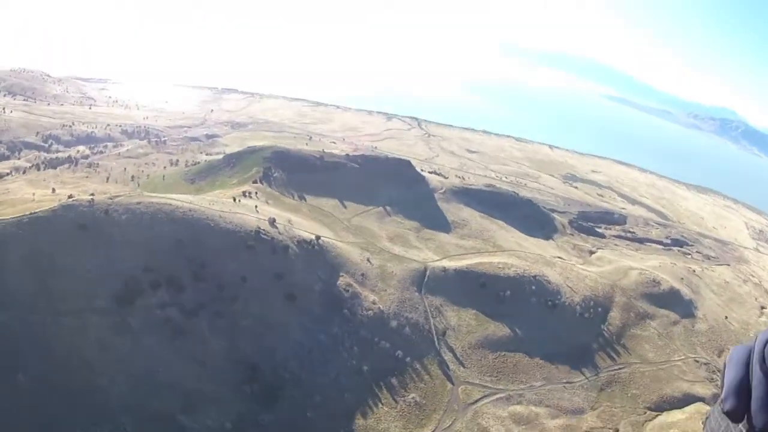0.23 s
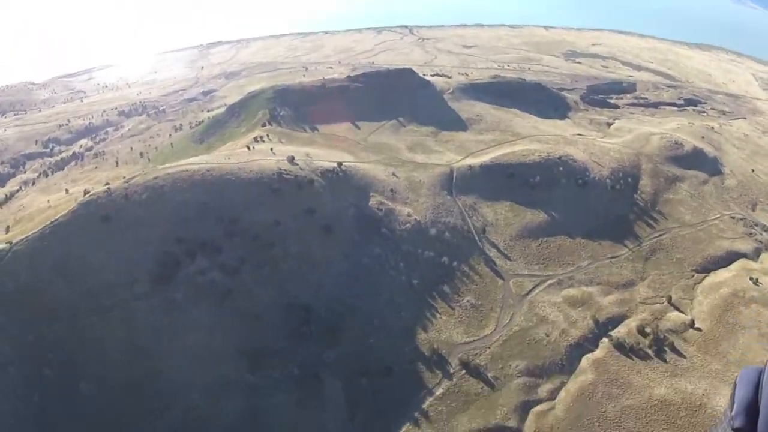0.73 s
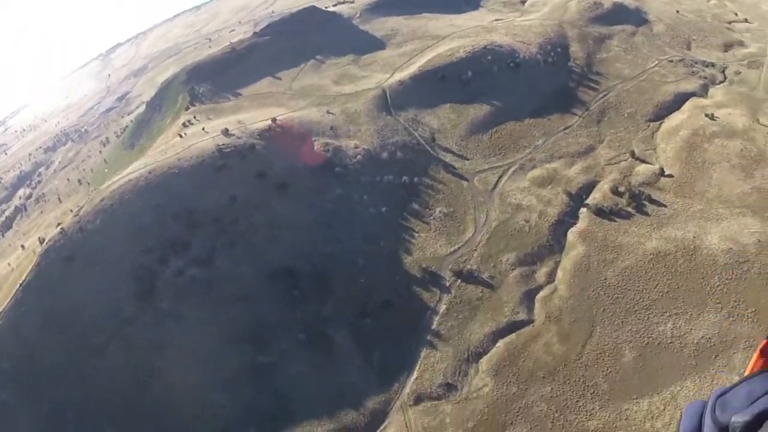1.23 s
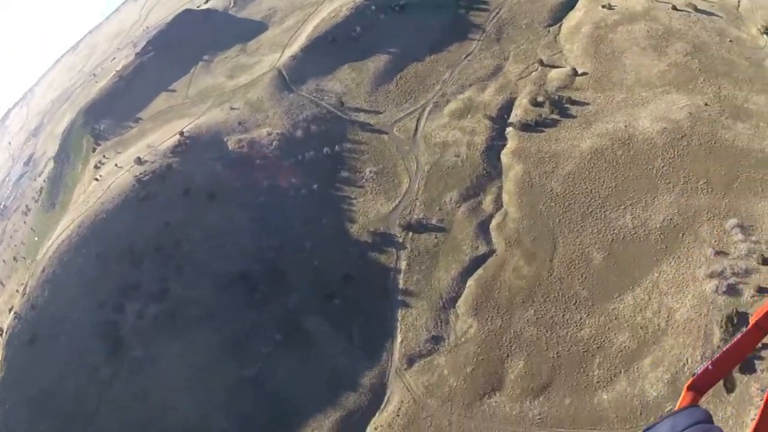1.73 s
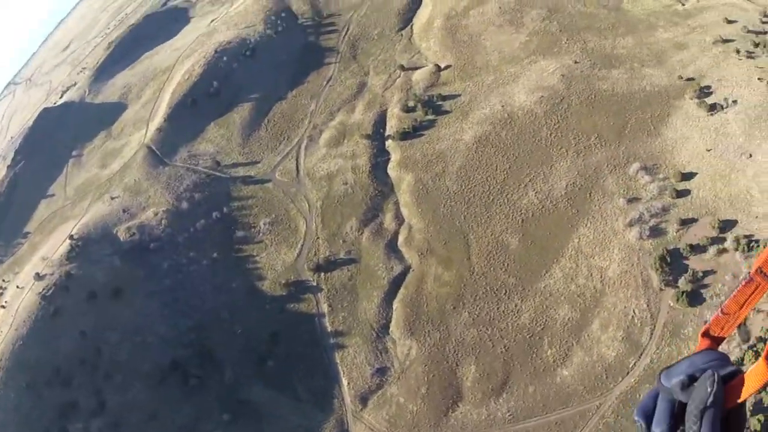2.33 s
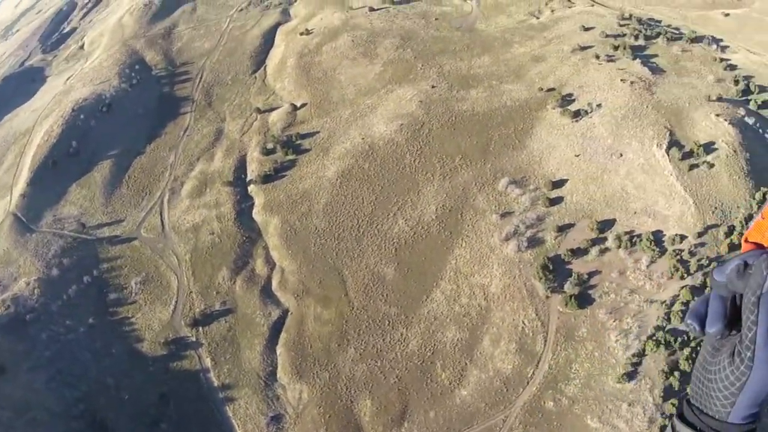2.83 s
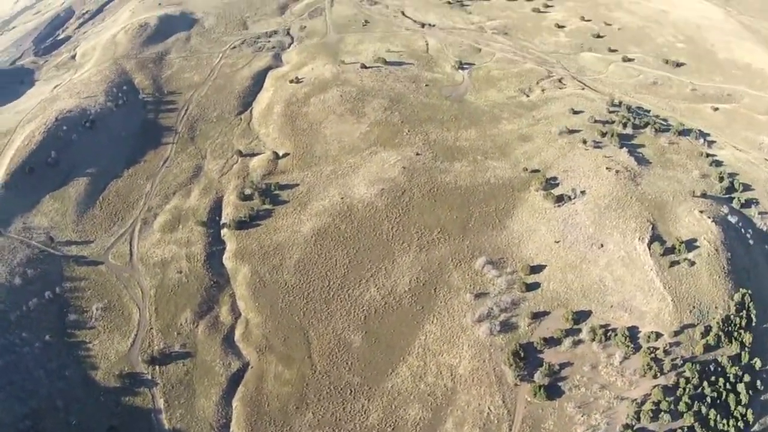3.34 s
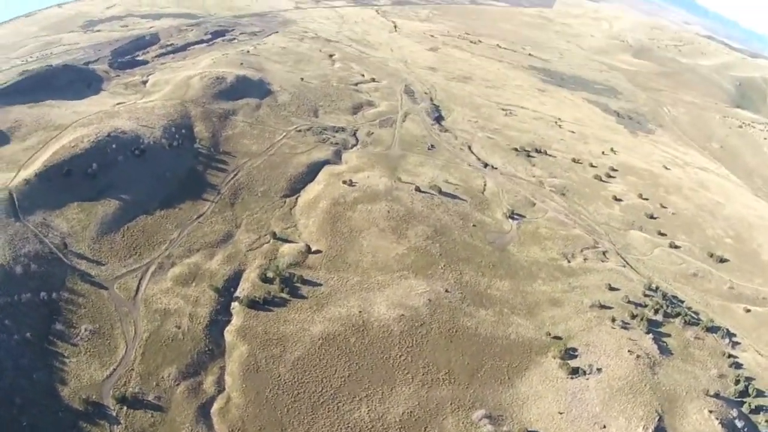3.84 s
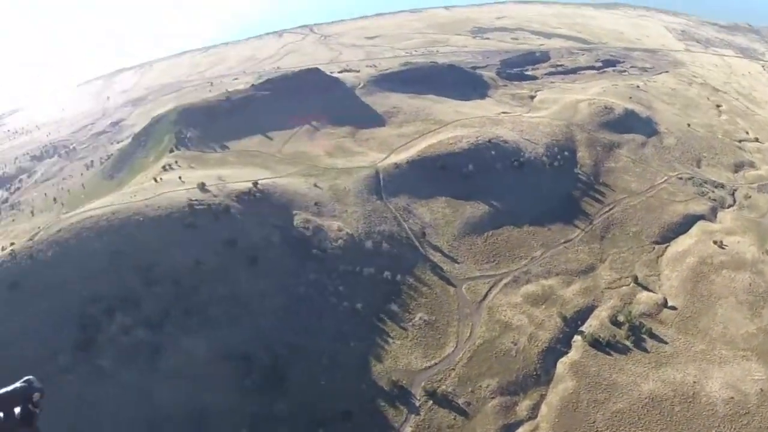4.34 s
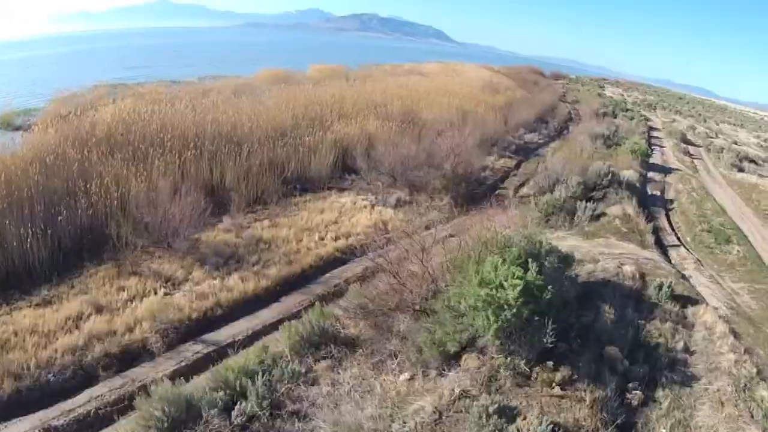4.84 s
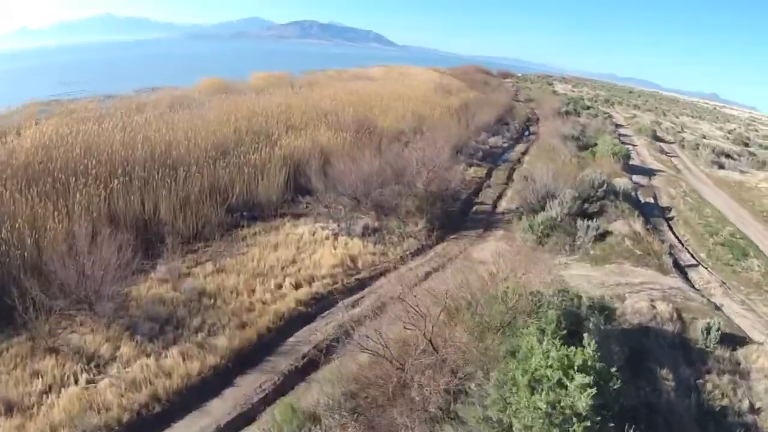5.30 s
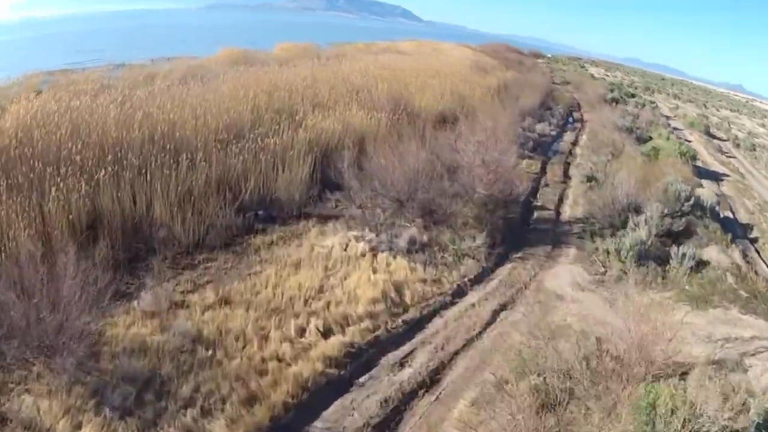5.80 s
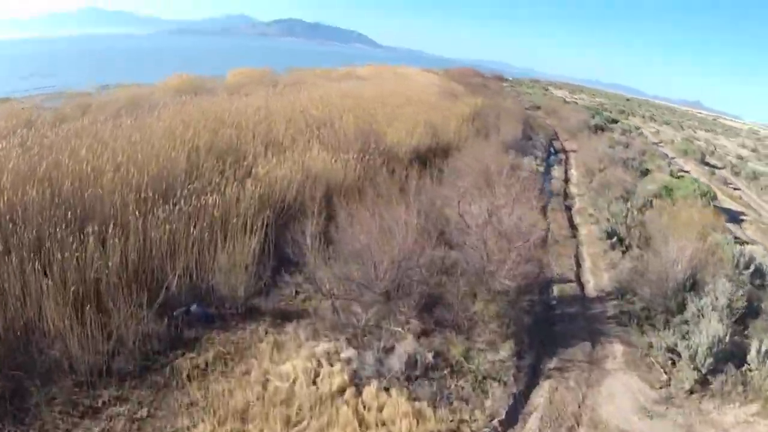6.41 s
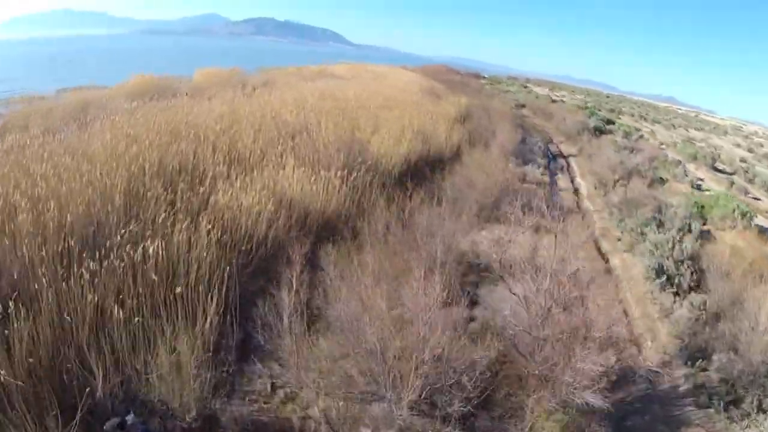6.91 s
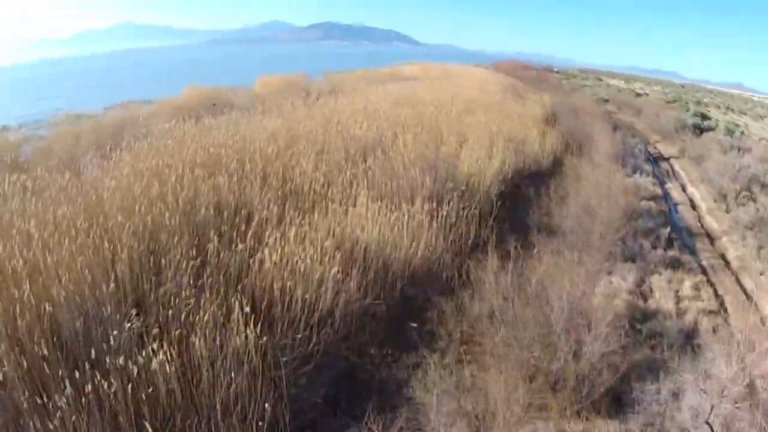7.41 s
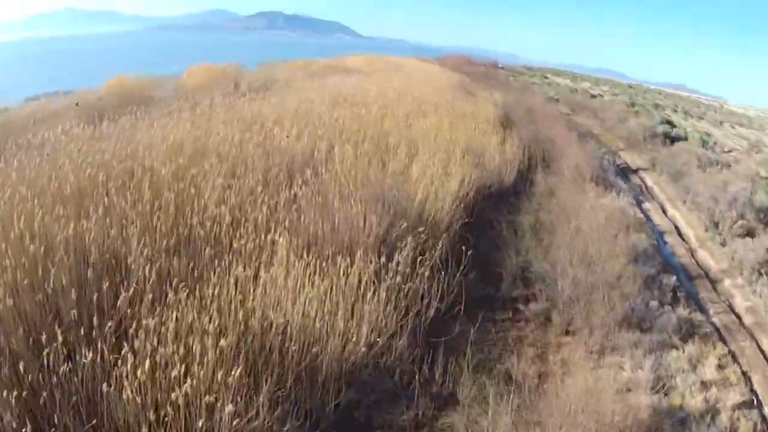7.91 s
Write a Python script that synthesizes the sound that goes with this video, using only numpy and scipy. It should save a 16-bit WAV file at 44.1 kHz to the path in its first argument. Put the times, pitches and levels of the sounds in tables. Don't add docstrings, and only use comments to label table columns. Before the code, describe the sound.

A paraglider's glide is heard as boxy, turbulent wind noise on a close helmet microphone, with deep wobbling booms from the shaking mount and a short high whistle near the start. After a calmer middle and renewed gusts, the sound fades out and back in quickly. Then a small engine buzzes steadily with fluttering pulses in the wind, plus faint housing whistles and coarse, low-quality treble.

```python
import sys
import numpy as np
from scipy import signal
from scipy.fft import rfft, irfft
from scipy.io import wavfile
from scipy.ndimage import uniform_filter1d

SR = 44100
rng = np.random.default_rng(int(sys.argv[2]) if len(sys.argv) > 2 else 0)


def boost(x):
    u = np.asarray(x, float) / 20
    return 10 ** u


def output_pcm(signal):
    pcm = np.clip(np.atleast_2d(signal).T, -1, 1) * 32767
    wavfile.write(sys.argv[1], SR, np.round(pcm).astype(np.int16))


N = 359415
JOIN_S = 4.891


def rms_one(x):
    return x / np.sqrt(np.mean(x ** 2) + 1e-20)


def in_time(rows):
    s, *columns = np.transpose(rows)
    return [np.interp(np.arange(N) / SR, s, column) for column in columns]


def drift(rate_hz):
    pole = np.exp(-2 * np.pi * rate_hz * 40 / SR)
    white = rng.standard_normal(N // 40 + 2002)
    slow = signal.lfilter([1], [1, -2 * pole, pole * pole], white)[2000:]
    return np.interp(np.arange(N) / 40, np.arange(len(slow)), rms_one(slow))


def tone(hz):
    return np.sqrt(2) * np.sin(2 * np.pi * (np.cumsum(hz) / SR + rng.random()))


def band(low_hz, high_hz):
    sos = signal.butter(2, [low_hz, high_hz], "band", fs=SR, output="sos")
    return rms_one(signal.sosfilt(sos, rng.standard_normal(N + SR))[SR:])


def housing_noise(colour, housing):
    hz = np.arange(N // 2 + 1) * SR / N + 1e-3
    at_hz, level_db = np.transpose(colour)
    gain_db = np.interp(np.log(hz), np.log(at_hz), level_db)
    for centre_hz, width_hz, top_db in housing:
        gain_db = gain_db + top_db / (1 + (2 * (hz - centre_hz) / width_hz) ** 2)
    return rfft(rng.standard_normal(N)) * boost(gain_db)


def air_levels(later):
    # t/s, airspeed level/dB, turbulence level/dB
    glide_air = [(0, -27.5, -37), (.35, -28, -32.5), (.85, -35, -32.5), (1.5, -35.5, -38),
                 (2.0, -33.5, -36.5), (2.5, -31.5, -41.5), (2.8, -29, -40), (3.1, -30, -37),
                 (3.7, -26.5, -39.5), (4.05, -29.5, -36), (4.35, -27.5, -37.5), (4.78, -27.5, -34.5)]
    # t/s, airspeed level/dB, turbulence level/dB
    power_air = [(5.02, -26.5, -37.5), (5.3, -22.5, -35.5), (6.02, -25.5, -34.5), (7.05, -24, -37),
                 (7.7, -23.5, -36.5), (8.15, -24.5, -38)]
    # share of airspeed [dB/dB], share of turbulence [dB/dB]
    air_follows = [(0.033, 0.95), (0.37, 0.55), (0.64, 0.039), (0.49, 0.29)]
    air = [np.where(later, b, a) for a, b in zip(in_time(glide_air), in_time(power_air))]
    levels = np.array(air_follows) @ np.array(air)
    levels[3] += 3 * np.clip((np.arange(N) / SR - 4.245) / .05 + .5, 0, 1)
    glide_mean = levels[:, ~later].mean(axis=1)[:, None]
    power_mean = levels[:, later].mean(axis=1)[:, None]
    return levels - np.where(later, power_mean, glide_mean)


def airflow(turns, patch_db, gust_db, throb_db):
    # f/Hz, level/dB
    glide_colour = [(110, 2.5), (160, 1), (300, -2.5), (600, -9), (1000, -11.5), (2000, -8.5), (3300, -11),
                    (4200, -17), (5400, -15)]
    # f/Hz, level/dB
    power_colour = [(110, -4.5), (160, 4), (300, 0.5), (600, -2), (1000, -2), (2000, 0), (3300, -2.5),
                    (4200, -6), (5400, -5.5)]
    # f/Hz, width/Hz, level/dB
    glide_housing = [(187.3, 31.7, 9), (760, 104, -5.5), (901, 20, 9.5), (1135, 305, 10), (1304, 120, 6.5),
                     (1516, 85, 4.5), (1685, 290, -0.5), (2445, 565, 11), (2730, 180, -2), (3035, 350, -5),
                     (3220, 81, 4), (3380, 80, -6), (3427, 120, 5), (3670, 390, 5)]
    # f/Hz, width/Hz, level/dB
    power_housing = [(743, 103, -7), (905, 57, 2.5), (978, 41, -7), (1053, 163, 5), (1236, 133, 9),
                     (1390, 104, -4.5), (1720, 60, -4), (1795, 85, -6.5), (2454, 456, 8.5),
                     (2670, 130, -8.5), (2970, 156, -15.5), (3230, 125, 4.5), (3530, 35, 7),
                     (5050, 140, -11.5), (4600, 180, -6.5)]
    air_hz = [250, 620, 2600, 4600, 5800]
    later = np.arange(N) / SR > JOIN_S
    spectra = [housing_noise(glide_colour, glide_housing), housing_noise(power_colour, power_housing)]
    levels = air_levels(later)
    octave = np.log2(np.arange(N // 2 + 1) * SR / N + 1e-3)
    gust = .4 * drift(4) + .8 * drift(18) + .6 * drift(50)
    puffs = later * exhaust_puffs(turns, die_away=5.5, miss=0.33)
    out = np.zeros(N)
    for centre in np.arange(6.5, 13, .5):
        window = np.cos(np.pi * np.clip(octave - centre, -.5, .5)) ** 2
        glide, power = [irfft(spectrum * window, N) for spectrum in spectra]
        place = np.interp(centre, np.log2(air_hz), [0, 1, 2, 3, 3.4])
        below = min(int(place), 2)
        level_db = levels[below] + (place - below) * (levels[below + 1] - levels[below])
        flicker_db = patch_db * drift(23) + gust_db * (.5 + .5 * place / 3) * gust
        beat_db = throb_db * min(place, 1) * puffs
        out += np.where(later, power, glide) * boost(level_db + flicker_db + beat_db)
    return boost(-17.5) * out


def swells():
    # start t/s, peak t/s, peak level/dB
    glide_gusts = [(-.03, 0.068, -10.5), (0.107, 0.18, -15.5), (0.284, 0.32, -15.5), (0.362, .417, -13),
                   (.462, .508, -16), (.558, 0.65, -14.5), (0.696, 0.724, -21), (0.943, 1.016, -30),
                   (1.057, 1.118, -27), (1.175, 1.237, -30), (1.249, 1.303, -31.5), (1.346, 1.408, -26.5),
                   (1.61, 1.68, -32.5), (1.75, 1.85, -26.5), (1.963, 2.05, -32), (2.09, 2.29, -29.5),
                   (2.361, 2.466, -27.5), (2.658, 2.78, -25.5), (2.803, 2.92, -29.5), (2.944, 3.1, -37),
                   (3.238, 3.324, -29.5), (3.429, 3.59, -21.5), (3.6, 3.644, -19.5), (3.671, 3.788, -14.5),
                   (3.878, 4.03, -11.5), (4.133, 4.211, -20.5), (4.253, 4.42, -21), (4.556, 4.586, -25),
                   (4.644, 4.676, -22), (4.707, 4.755, -28)]
    # start t/s, peak t/s, end t/s, peak level/dB
    power_swells = [(5.04, 5.37, 5.641, -10.5), (5.08, 5.17, 5.3, -19), (5.641, 5.693, 5.746, -24),
                    (5.746, 5.87, 5.934, -20), (5.934, 5.993, 6.052, -27), (6.052, 6.55, 7.15, -12),
                    (6.65, 7.06, 7.3, -14.5), (7.18, 7.3, 7.36, -21), (7.34, 7.42, 7.585, -22),
                    (7.585, 7.74, 7.789, -25.5), (7.789, 7.925, 8.097, -19.5), (8.097, 8.15, 8.2, -31)]
    t = np.arange(N) / SR
    ends = [row[0] for row in glide_gusts[1:]] + [4.79]
    rows = [(start, peak, end, db) for (start, peak, db), end in zip(glide_gusts, ends)]
    rows = rows + list(power_swells)
    power = np.zeros(N)
    for start, peak, end, db in rows:
        span = slice(max(int(start * SR), 0), int(end * SR))
        place = np.interp(t[span], [start, peak, end], [0, .5, 1])
        tent = 1 - np.abs(2 * place - 1)
        rounded = tent + .4 * (np.sin(np.pi * place) - tent)
        arch = rounded ** np.where(place < .5, 1.0, 1.2)
        power[span] += (boost(db) * arch) ** 2
    knocks = [b[0] for a, b in zip(rows, rows[1:]) if abs(b[0] - a[2]) < .005]
    return np.sqrt(uniform_filter1d(power, size=900) + 1e-12), knocks


def mount():
    # t/s, f/Hz
    mount_pitch = [(0, 87.5), (.3, 87.5), (.75, 89.5), (1.2, 87), (2.2, 85.7), (2.5, 88.5), (2.9, 85),
                   (3.6, 89.5), (4.2, 88), (4.9, 82.5), (5.2, 84.5), (5.35, 87), (6.4, 87), (6.9, 85.2),
                   (7.2, 85), (7.4, 87), (8.15, 84.8)]
    t = np.arange(N) / SR
    hz, = in_time(mount_pitch)
    swing, knocks = swells()
    jumps = rng.uniform(.3, .5, len(knocks)) * rng.choice([-1, 1], len(knocks))
    shift = np.append(0, np.cumsum(jumps))[np.searchsorted(knocks, t)]
    turns = np.cumsum(hz + .5 * drift(7.2)) / SR + uniform_filter1d(shift, size=700)
    flutter = boost(.5 * drift(12))
    ring = swing * flutter * np.sqrt(2) * np.sin(2 * np.pi * turns) + boost(-35) * band(65, 107)
    mean_db = 10 * np.log10(uniform_filter1d(swing ** 2, size=11000) + 1e-4)
    heave_db = np.where(t > JOIN_S, -44.5, -35) + .41 * (mean_db + 23.5)
    return ring + boost(heave_db + .53 * drift(8.1)) * band(29.5, 60)


def line_whistle():
    # start t/s, end t/s, lowest f/Hz, rise f/Hz, warble f/Hz, warble rate [1/s], first crest t/s
    whistle = (.04, .44, 3300, 165, 30, 12.9, .085)
    t = np.arange(N) / SR
    start, end, low_hz, rise_hz, warble_hz, rate, crest = whistle
    climb = rise_hz * np.interp(t, [start, crest + 1.1 / rate, end], [0, 1, 0])
    lift = climb + warble_hz * np.cos(2 * np.pi * rate * (t - crest))
    gate = np.clip(np.minimum(t - start, end - t) / .013, 0, 1)
    level_db = -43 + .03 * lift + 1.4 * drift(40)
    return gate * boost(level_db) * tone(low_hz + lift + 14 * drift(60))


def firing_phase():
    # t/s, firing rate f/Hz
    speed = [(4.9, 59.8), (5.1, 60.8), (5.21, 61.2), (5.37, 66), (5.5, 64.6), (6.2, 64.8), (6.4, 63.8),
             (6.8, 63.7), (7.1, 63), (7.2, 63.2), (7.31, 64.8), (7.57, 62.2), (7.73, 64.7), (8.0, 62.6),
             (8.15, 62.3)]
    rate, = in_time(speed)
    return np.cumsum(rate * (1 + .0015 * drift(6))) / SR


def exhaust_puffs(turns, die_away, miss):
    cycle = turns.astype(int)
    uneven = np.exp(.12 * rng.standard_normal(cycle[-1] + 1))[cycle]
    strength = uneven * (1 + miss * (-1.) ** cycle)
    puffs = uniform_filter1d(strength * np.exp(-die_away * (turns - cycle)), size=160)
    return puffs - puffs.mean()


def engine(turns, wander_db):
    # multiple of the firing rate [1], level/dB
    firing_orders = [(.5, -20), (1, 0), (2, -11), (3, -14), (4, -10), (5, -17), (6, -11.5), (7, -13.5),
                     (8, -20), (9, -22), (10, -18), (11, -28), (12, -28), (13, -28), (14, -25), (16, -21),
                     (17, -21), (18, -22), (20, -21)]
    # multiple of the blade rate [1], level/dB
    blade_orders = [(2, -19), (5, -18), (6, -19), (7, -11), (8, -30), (10, -24), (14, -18)]
    blade_tones = [(k * 1.346, db) for k, db in blade_orders]
    out, start = np.zeros(N), int(JOIN_S * SR)
    for multiple, order_db in list(firing_orders) + blade_tones:
        slip = .02 * np.sqrt(multiple) * drift(4)[start:]
        wave = np.sqrt(2) * np.sin(2 * np.pi * (multiple * turns[start:] + slip + rng.random()))
        level_db = order_db + wander_db * min(multiple, 4) / 4 * drift(5.2)[start:]
        out[start:] += boost(level_db) * wave
    return out * boost(-29)


def gap_whines():
    # start t/s, end t/s, f/Hz, level/dB
    whines = [
        (5.25, 6.3, 1575, -43),
        (6.35, 7.25, 1625, -41),
        (5.2, 5.35, 5250, -49),
        (5.58, 6.02, 5228, -43),
        (6.12, 6.3, 5215, -49),
        (6.8, 6.95, 5230, -51),
        (7.2, 7.35, 5230, -51),
        (7.7, 7.9, 5225, -50),
    ]
    t = np.arange(N) / SR
    out = np.zeros(N)
    for start, end, whine_hz, whine_db in whines:
        gate = np.clip(np.minimum(t - start, end - t) / .047, 0, 1)
        out += gate * boost(whine_db + 2 * drift(8)) * tone(whine_hz + 4 * drift(5))
    return out


def scene():
    turns = firing_phase()
    air = airflow(turns, patch_db=0.7, gust_db=0.52, throb_db=6.0)
    drone = engine(turns, wander_db=2.3)
    return (air + mount() + line_whistle() + drone + gap_whines())[None]


def roll_off(x):
    return signal.sosfilt(signal.butter(12, 16110, fs=SR, output="sos"), x)


def record(dry):
    anti_alias = signal.butter(12, 5466, fs=SR, output="sos")
    coarse = signal.resample_poly(signal.sosfilt(anti_alias, dry), 40, 147, axis=1)
    held = signal.resample_poly(np.repeat(coarse, 4, axis=1), 147, 160, axis=1)[:, :N]
    t = np.arange(N) / SR - JOIN_S
    fade = np.clip(np.where(t < 0, -t / .12, t / .1), 1e-3, 1)
    top = signal.ellip(14, .5, 70, 15290, fs=SR, output="sos")
    mix = signal.sosfilt(top, held * fade)
    return roll_off(mix)


dry = scene()
out = record(dry)
output_pcm(out)
```